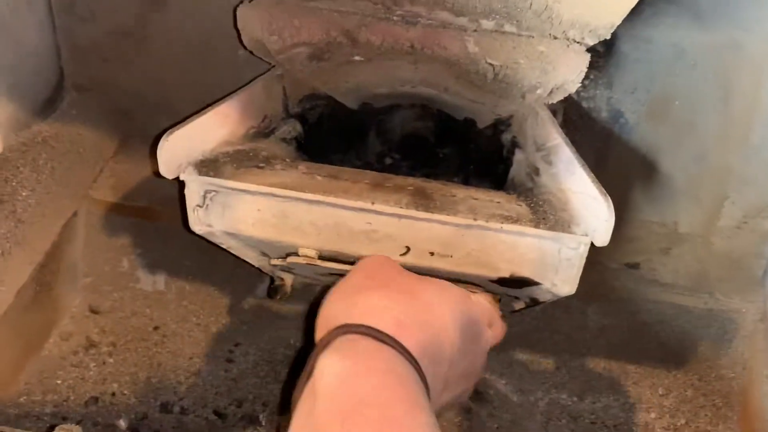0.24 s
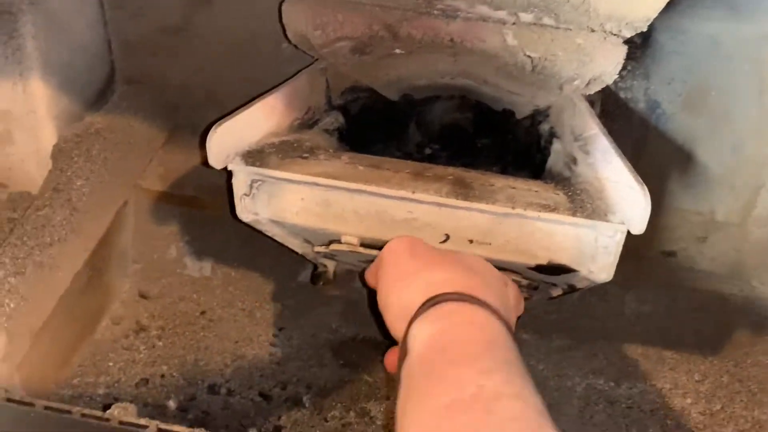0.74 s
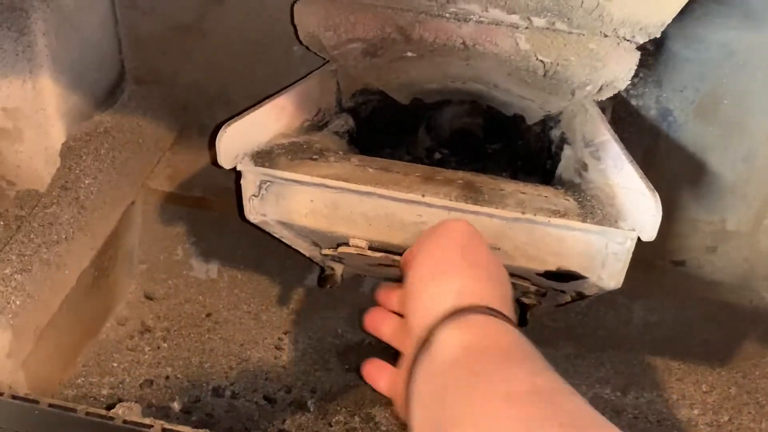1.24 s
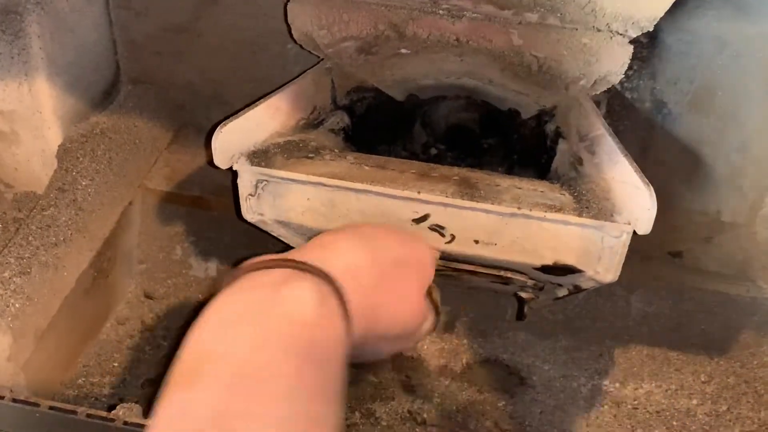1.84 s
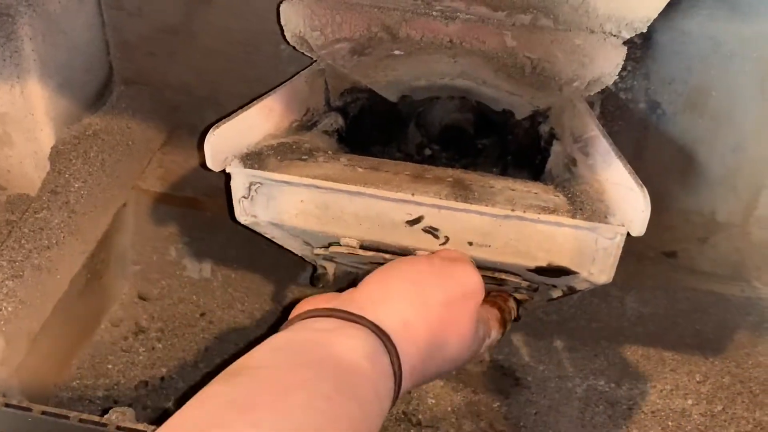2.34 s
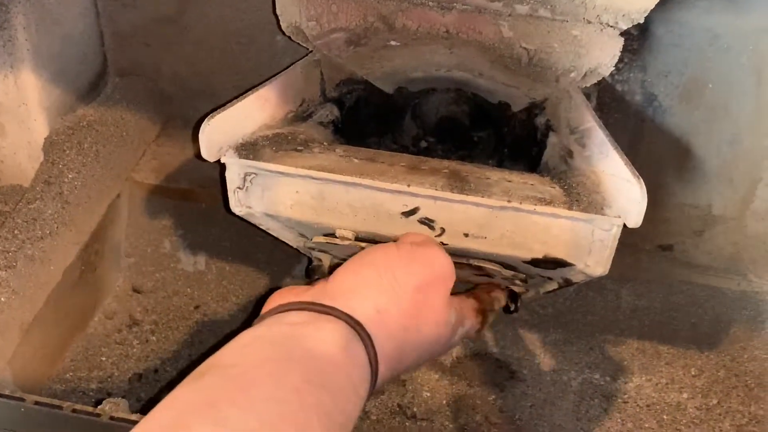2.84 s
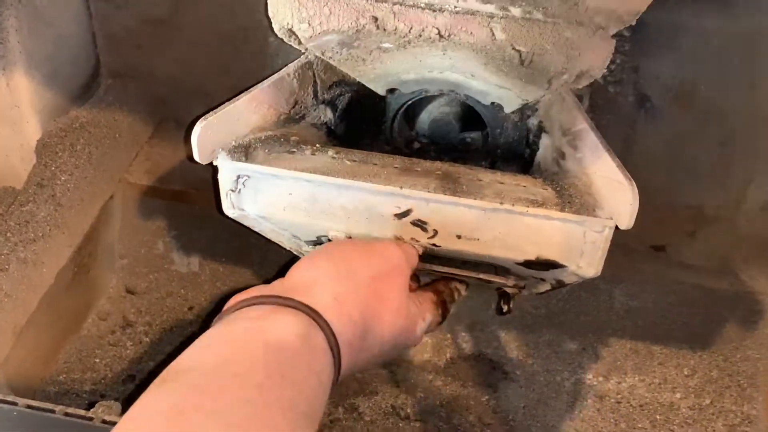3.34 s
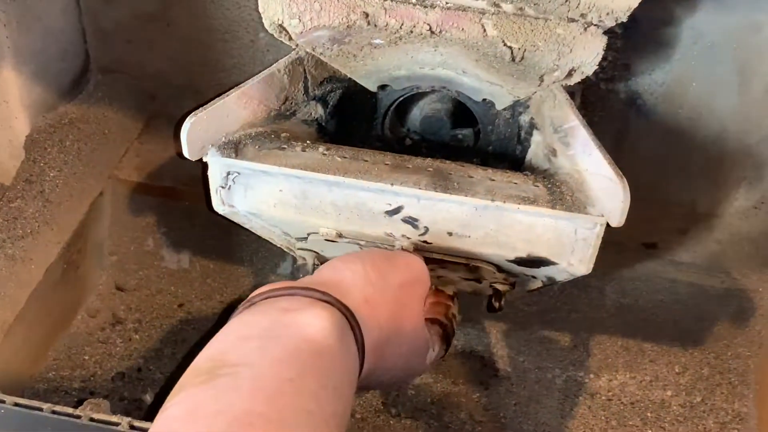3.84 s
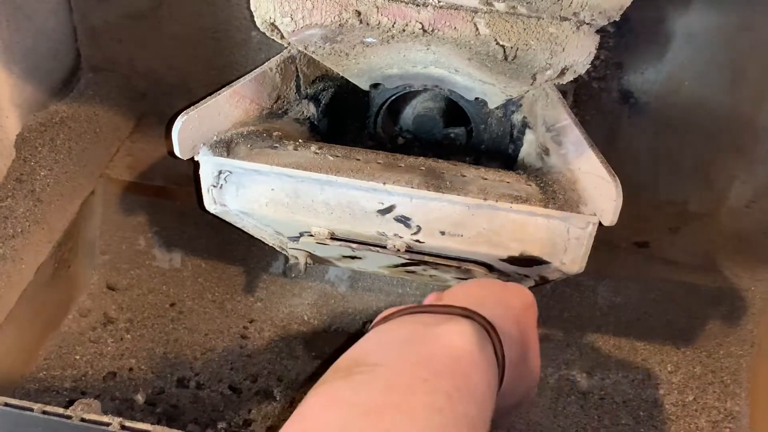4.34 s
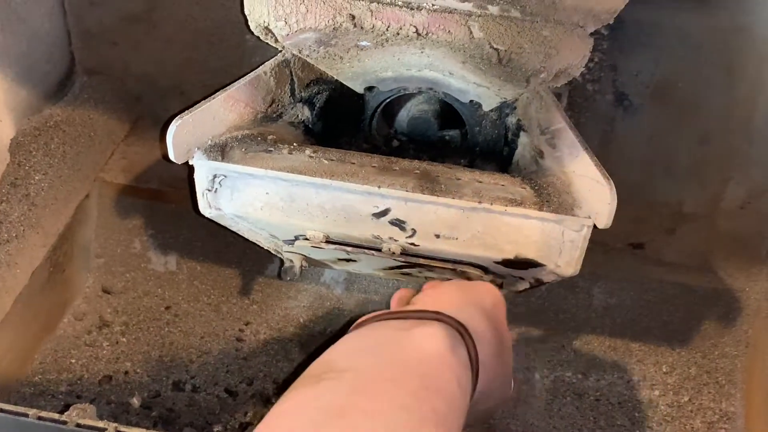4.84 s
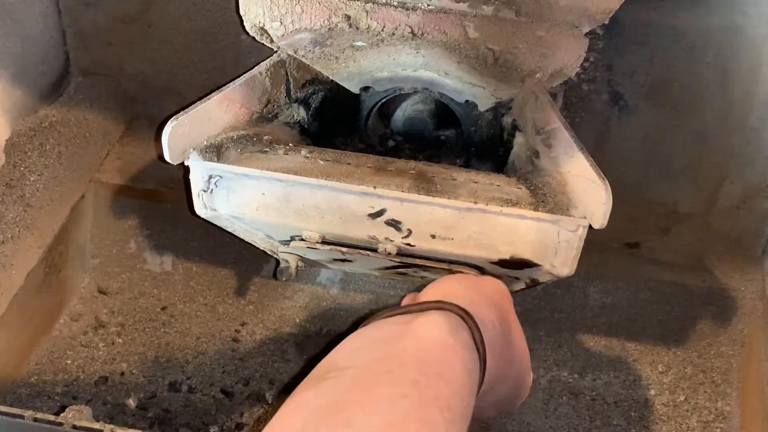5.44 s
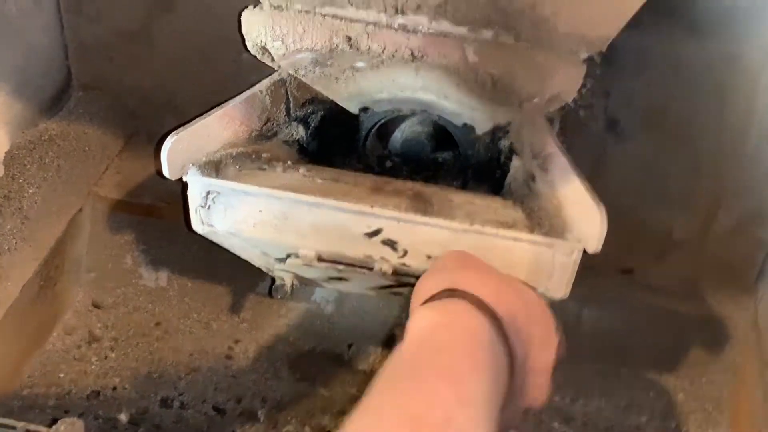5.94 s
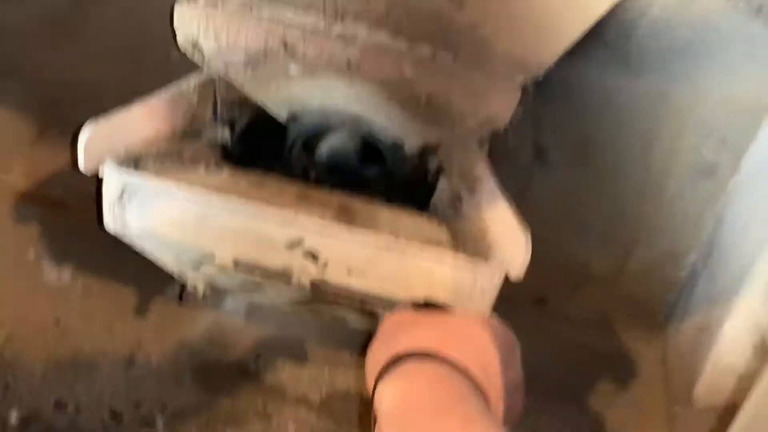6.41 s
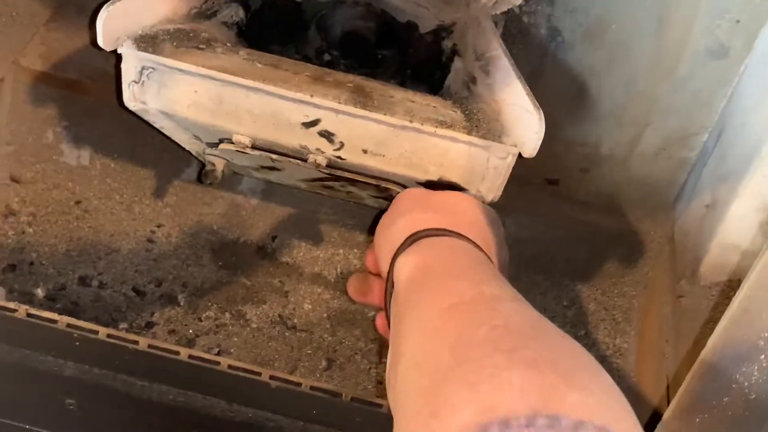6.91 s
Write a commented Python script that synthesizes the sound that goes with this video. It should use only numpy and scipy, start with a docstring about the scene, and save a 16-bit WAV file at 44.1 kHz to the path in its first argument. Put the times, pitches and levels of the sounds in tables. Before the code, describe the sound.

Close stereo sound of a stiff slide on a small sheet-metal stove's ash door, in a quiet small room with a faint steady low hum. At 0 s three quick hard clanks boom in the hollow pan with brief squeals and a rattle. From 0.2 to 2.3 s there are only faint gritty rubs and a soft low thump near 0.6. At 2.4 a loud bright double clack strikes, then smaller knocks, scraping and loose jiggling until 2.6. Light taps lead to sharp clanks at 3.2, with high wire ringing, and the loudest double clack at 3.47. Dull knocks follow at 3.7. A moderate clack comes at 4.4 and a bright, slightly squealing one at 5.0. Soft jiggling and pattering ash crumbs rise near 5.5, with lighter knocks around 6.0 and 6.6, low handling rumbles, and faint scraping to the end near 7 s.

```python
"""The stiff slide on a small metal stove's ash door scrapes, clanks and thumps, close by in a small room.
Grit crushed in uneven slips rasps; chattering blows ring the door and boom in the hollow pan, and a loose
slide rattles on after sharp ones. Swells of narrow noise squeal and rumble; the wire handle's modes ring.
Chance taps and rubbing jiggle the loose door, and crumbs of ash patter down as short noise ticks.
A faint mains hum wavers in still air; two spaced microphone ports hear it all, with a short room tail."""
import sys
import numpy as np
from scipy import signal
from scipy.fft import rfft, irfft, next_fast_len
from scipy.io import wavfile
from scipy.ndimage import uniform_filter1d

SR = 44100
rng = np.random.default_rng(int(sys.argv[2]) if len(sys.argv) > 2 else 0)


def generate_wav(sig):
    """Save sig (samples, or channels by samples) to the path in sys.argv[1] as 16-bit PCM at SR."""
    pcm = np.round(np.clip(np.atleast_2d(sig).T, -1, 1) * 32767).astype(np.int16)
    wavfile.write(sys.argv[1], SR, pcm)


N = 316197

# Blows of the slide. Hardness sets treble against middle: near 0 is bare metal, -30 is cushioned by ash.
# Columns: start_s, strength_db, hardness_db, rise_s, grind_s (how long the edges grind at full force)
KNOCKS = [(.0095, -30, -6.5, 0.00039, 0.0053), (0.0401, -28, -3.5, 0.00044, 0.004),
          (0.058, -29.5, -5, 0.00056, 0.0087), (0.231, -55.5, -42, 0.00058, 0.0023),
          (.385, -74, -29, 0.0028, 0.0096), (1.024, -75.5, -4, .004, 0.016),
          (1.491, -72.5, -10, 0.00095, 0.0035), (2.067, -53.5, -20, .001, 0.0025),
          (2.392, -25, 1.5, 0.00067, 0.0054), (2.403, -26.5, -25, 0.00049, 0.0026),
          (2.463, -39.5, -12.5, 0.00036, .001), (2.5, -35.5, -4.5, 0.00065, 0.0031),
          (2.555, -40.5, -10.5, 0.0029, 0.0019), (2.604, -49, -29, 0.00095, 0.0038),
          (2.762, -81, 8.5, .001, 0.0021), (2.912, -69.5, 7, 0.001, 0.003),
          (2.953, -49, -26.5, 0.0013, 0.0012), (2.99, -60, 1, 0.0019, 0.0045),
          (3.054, -58, -15.5, 0.0026, 0.0038), (3.114, -44.5, -12.5, 0.002, 0.0088),
          (3.178, -27, -2.5, 0.00048, 0.015), (3.2311, -30.5, -2, 0.00065, 0.003),
          (3.258, -37.5, -11, 0.0013, 0.0022), (3.462, -23.5, -0.5, 0.0013, 0.0073),
          (3.4705, -23, -3, 0.00015, 0.0019), (3.675, -53, -28.5, 0.0032, 0.005),
          (3.714, -51, -32.5, 0.0055, 0.015), (3.741, -42, -35.5, 0.001, 0.006),
          (4.117, -64.5, -22.5, 0.0013, 0.0038), (4.155, -61.5, -12, 0.0015, 0.0052),
          (4.265, -57.5, -44, 0.003, 0.018), (4.355, -50.5, 0.5, 0.0031, 0.0061),
          (4.394, -35.5, -2.5, 0.00061, 0.0067), (4.501, -64.5, 1.5, 0.00088, .003),
          (4.543, -61, -32, 0.0013, 0.0097), (4.73, -65, -16.5, 0.0018, 0.015),
          (4.829, -50.5, -2, 0.0018, 0.0031), (4.965, -51.5, -19, 0.0066, 0.0086),
          (5.005, -39.5, 2.5, 0.00047, 0.0056), (5.029, -52, -31, 0.00044, .002),
          (5.454, -45.5, -17.5, 0.00091, 0.0063), (5.543, -71, -30, 0.0051, .012),
          (5.579, -54.5, -5, 0.002, 0.014), (5.671, -65, 0.5, 0.00098, 0.0037),
          (5.878, -74, 8.5, 0.0008, 0.0026), (5.937, -52.5, -9, 0.00024, 0.00092),
          (5.957, -52, -22, .002, 0.021), (6.012, -42.5, -0.5, 0.0054, 0.0061),
          (6.04, -55.5, -20, .002, 0.0037), (6.534, -68, -10, 0.0012, 0.0025),
          (6.591, -41, -2, 0.0026, 0.012), (6.639, -56.5, -25, .002, 0.0044),
          (7.035, -52, -29.5, 0.0038, 0.0064)]
# Broad spectrum of metal struck by the slide. Columns: frequency_hz, density_db (per Hz)
KNOCK_COLOUR = [(20, -47.5), (60, -17.5), (110, -0.5), (190, 3), (300, -0.5), (500, -4), (1100, -7.5),
                (1700, -7.5), (3000, 0.5), (5000, -11), (7000, -6.5), (11000, 0), (13000, -2),
                (16000, -6.5)]


def amp(db):
    """Decibels to gain."""
    return 10 ** (np.asarray(db) / 20)


def unit(x):
    """Scales to rms 1."""
    return x / np.sqrt(np.mean(x ** 2) + 1e-20)


def fade(t, t60):
    """Exponential decay that falls by 60 dB in t60 seconds."""
    return np.exp(-np.log(1000) * t / t60)


def unevenness(count, size):
    """Random wobble of rms 1 that changes within about size samples."""
    return unit(uniform_filter1d(rng.standard_normal(count), size))


def read(points, hz):
    """Reads a table on a log-frequency axis."""
    f, value = np.transpose(points)
    return np.interp(np.log(hz + 1), np.log(f + 1), value)


def add(mix, s, sound):
    """Adds a sound to the two-channel mix at time s."""
    part = mix[:, max(round(s * SR), 0):][:, :sound.shape[-1]]
    part += sound[..., :part.shape[-1]]


def colour(x, points):
    """Filters by a smooth spectrum, with the minimum phase that keeps it causal."""
    size = 2 * next_fast_len(x.shape[-1] // 2 + 2048)
    log_gain = np.log(amp(read(points, abs(np.fft.fftfreq(size, 1 / SR)))))
    response = np.exp(signal.hilbert(log_gain).conj())[:size // 2 + 1]
    return irfft(rfft(x, size) * response, size)[..., :x.shape[-1]]


def registers(x):
    """Splits into the pan's bass, the door's middle and the contact's treble."""
    parts = []
    for hz, kind in [(700, "low"), ([700, 6000], "band"), (6000, "high")]:
        sos = signal.butter(4, hz, kind, fs=SR, output="sos")
        parts.append(signal.sosfilt(sos, x))
    return parts


def rings(modes, gain_db=11.0):
    """Each strong mode rings as a decaying cosine, one a row; a wider resonance dies sooner."""
    t = np.arange(SR // 4) / SR
    hz, width, db = np.transpose(modes)[:, :, None]
    rate = np.pi * width
    return amp(db + gain_db) * 2 * rate / SR * np.exp(-rate * t) * np.cos(2 * np.pi * hz * t)


def touch(body, ring_db, sheet_db, place_db=3.3, sheet_t60=.12, modes_per_hz=.008):
    """Response at one point of contact: the direct click, its own mix of strong modes, and many weak sheet modes."""
    count = body.shape[1]
    t = np.arange(count) / SR
    awake = rng.random(count // 2 + 1) < modes_per_hz * SR / count
    phase = 2 * np.pi * rng.random((2, len(awake)))
    sheet = irfft(awake * np.exp(1j * phase), count) * fade(t, sheet_t60)
    strong = amp(ring_db + place_db * rng.standard_normal(len(body))) @ body
    click = t == 0
    return click + strong + amp(sheet_db) * sheet / np.linalg.norm(sheet[0])


def background(hum_hz=120, hum_db=-61.5, air_db=-66, waver=0.12):
    """Mains hum, a sine wavering slightly in level and phase, in the coloured noise of still room air."""
    # Spectrum of the quiet room. Columns: frequency_hz, density_db (per Hz)
    air_colour = [(20, -12.5), (60, 1.5), (100, 4.5), (200, -9.5), (400, -15.5), (1000, -23.5),
                  (3000, -29.5), (5500, -38), (8000, -33), (11000, -34), (16000, -33.5)]
    t = np.arange(N) / SR
    slow = [(1, 0), (6, 0), (40, -50), (200, -120)]  # Hz, dB: keeps the drift slow
    level_drift, phase_drift = unit(colour(rng.standard_normal((2, N)), slow))
    hum = (1 + waver * level_drift) * np.sin(2 * np.pi * hum_hz * t + waver * phase_drift)
    still_air = unit(colour(rng.standard_normal((2, N)), air_colour))
    return amp(hum_db) * unit(hum) + amp(air_db) * still_air


def scrapes(grains_per_s=600, spread_db=3.0, smooth=0.22, slip_db=2.0, lurch_db=1.24, ring_db=5, sheet_db=-2):
    """Grit crushed in tiny uneven slips, as noise with random grains; each stroke swells, lurches and eases off."""
    # Strokes, and a short noise swelling just before the blow at 2.39 s; fizz is the treble over the rasp,
    # change runs along the stroke. Columns: start_s, length_s, pressure_db, fizz_db, change_db
    strokes = [(0, 0.048, -31.5, -8.5, -30), (0.363, 0.041, -69.5, -13, 9), (0.605, 0.13, -59, -14, -8),
               (0.681, 0.2, -71, -10, -8), (1.103, 0.13, -60.5, -12, -8), (1.206, .09, -71, -17, -10),
               (1.533, 0.046, -76.5, 10.5, 1), (1.762, 0.064, -66, 1.5, 2.5), (1.944, 0.15, -63, -10, -11),
               (2.059, 0.16, -59, -11, -10), (2.222, 0.055, -74.5, -1, -6), (2.36, 0.07, -44.5, -4, 14),
               (2.43, 0.09, -47, -5, -3.5), (2.522, 0.094, -51.5, 0, -26), (3.163, 0.03, -38, 0.5, 30),
               (3.394, 0.098, -42.5, -4.5, 5.5), (3.922, 0.18, -57, -12, -18), (4.346, 0.073, -49.5, 0, -2),
               (4.433, 0.096, -59.5, -11, 12), (4.6, 0.092, -70, -21, -0.5), (4.751, 0.087, -69.5, -15, 4),
               (5.218, 0.056, -60, -7.5, -22), (5.344, 0.077, -64, -2.5, 1), (5.73, 0.14, -60.5, -6, -9),
               (6.13, 0.135, -61.5, -8, 16), (6.296, 0.073, -72, -24, 1), (6.565, 0.046, -52, -2.5, 15),
               (6.781, 0.15, -59, -4.5, 15)]
    # Broad spectrum of scraping. Columns: frequency_hz, density_db (per Hz)
    scrape_colour = [(30, -35), (120, -6), (222, 13), (300, 3.5), (500, 0), (700, -9.5), (920, 1),
                     (1400, -5.5), (1750, -5), (2600, -3.5), (3500, -5.5), (4350, -7.5), (5500, -17),
                     (7500, -17.5), (11000, -10.5), (16000, -13)]
    # Resonances rubbing brings out of the sooty compartment. Columns: frequency_hz, width_hz, level_db
    compartment = [(220, 25, -0.5), (480, 18, 2.5), (809, 19, -3), (933, 80, -1), (1653, 16, 3),
                   (1900, 56, -4.5), (2353, 29, -1.5), (2580, 19, 3.5), (2880, 18, 1.5), (3535, 28, -3.5),
                   (4254, 40, 0), (4430, 28, 0), (5390, 90, -4)]
    bite_s, ease_s = 0.043, .04  # ramps at the start and end of a stroke
    drone_db = -2.5  # bass against the rasp in the middle
    hollow = rings(compartment)
    out = np.zeros((2, N))
    for s, length, pressure, fizz, change_db in strokes:
        bands = registers(colour(touch(hollow, ring_db, sheet_db), scrape_colour))
        count, size = int(length * SR), SR // 2
        t = np.arange(count) / SR
        speed = np.minimum(t / bite_s, 1) * np.minimum((length - t) / ease_s, 1)
        push = speed * amp(change_db * t / length)
        grain_size = amp(spread_db * np.minimum(rng.exponential(1, size), 4))
        grit = (rng.random(size) < grains_per_s / SR) * grain_size
        grip = amp(slip_db * unevenness(size, size=300) + lurch_db * unevenness(size, size=1500))
        force = rng.standard_normal((2, size)) * (smooth + grit) * grip
        for band, db in zip(bands, (drone_db, 0, fizz)):
            sound = signal.fftconvolve(force[:, :count] * push, band, axes=1)
            add(out, s, amp(pressure + db) * sound / np.std(sound[:, :count], axis=1, keepdims=True))
    return out


def swells(rows, peak_share=.14):
    """Narrow noise around one pitch swells to an early peak and fades."""
    out, hz = np.zeros((2, N)), np.fft.rfftfreq(SR, 1 / SR)
    for s, length, pitch_hz, width_hz, db in rows:
        resonance = 1 / (1 + (2 * (hz - pitch_hz) / width_hz) ** 2)
        tone = irfft(rfft(rng.standard_normal((2, SR))) * resonance)
        u = np.linspace(0, 1, int(length * SR))
        shape = np.minimum(u / peak_share, 1) * (1 - u) ** 2
        sound = tone[:, :len(u)] * shape
        add(out, s, amp(db) * sound / np.std(sound, axis=1, keepdims=True))
    return out


def thumps_and_rumbles():
    """Short swells of low and low-middle noise: thumps, handling rumble and panel ringing."""
    # Columns: start_s, length_s, pitch_hz, width_hz, level_db
    low_rows = [(0, 0.24, 205, 56, -43), (0.01, 0.13, 520, 220, -39), (0.01, 0.42, 69, 40, -62),
                (.05, .1, 594, 40, -36.5), (.635, 0.16, 228, 45, -55), (.64, .1, 400, 200, -62),
                (3.47, .1, 100, 60, -52), (2.391, 0.058, 707, 30, -35), (2.391, 0.06, 590, 160, -36),
                (2.392, 0.06, 160, 70, -46), (5.005, 0.08, 200, 160, -52), (6.83, 0.15, 226, 25, -57),
                (5.935, 0.12, 71, 30, -58), (6.11, 0.26, 50, 41, -59), (6.6, 0.08, 150, 69, -55)]
    return swells(low_rows)


def jiggle_level():
    """Level in dB, over time, of the hand's jiggling at the loose door."""
    # Two lists in sequence, level before each band's own gain. Columns: time_s, level_db
    course = [
        [(0.3, -73), (0.98, -82), (2.41, -69.5), (2.55, -39), (2.69, -64), (2.9, -57.5)],
        [(3.8, -63), (5.05, -63), (5.56, -52.5), (6.56, -75), (6.72, -67.5), (7.15, -63)],
    ]
    return np.interp(np.arange(N) / SR, *np.vstack(course).T)


def jiggle(body, gains_db=(-1.5, -13, -32), taps_per_s=18, tap_t60=0.24, rub=0.12, ring_db=-2, sheet_db=0):
    """Soft chance taps and light rubbing of the loose door, heard mostly through the pan."""
    # Broad spectrum of the jiggling. Columns: frequency_hz, density_db (per Hz)
    jiggle_colour = [(30, -20), (130, 9), (250, 6.5), (500, -4.5), (1000, -9.5), (2500, -3.5),
                     (5000, -24.5), (16000, -25.5)]
    taps = (rng.random(N) < taps_per_s / SR) * rng.random(N)
    contact = rub + signal.fftconvolve(taps, fade(np.arange(SR // 5) / SR, tap_t60))[:N]
    force = rng.standard_normal((2, N)) * contact
    bands = registers(colour(touch(body, ring_db, sheet_db), jiggle_colour))
    sound = np.zeros((2, N))
    for band, db in zip(bands, gains_db):
        sound += amp(db) * unit(signal.oaconvolve(force, band, axes=1)[:, :N])
    return sound * amp(jiggle_level())


def crumbs(level_db=-11, crumbs_per_s=70, spread_db=3, crumb_t60=.06):
    """Crumbs of ash loosened by the jiggling land in the pan, each with its own short, dull tick."""
    # Spectrum of crumbs on the pan. Columns: frequency_hz, density_db (per Hz)
    crumb_colour = [(60, -27), (300, 5.5), (1000, -3.5), (2000, -13.5), (7000, -31.5), (16000, -32.5)]
    t, out = np.arange(SR // 16) / SR, np.zeros((2, N))
    size = (rng.random(N) < crumbs_per_s / SR) * amp(spread_db * np.minimum(rng.exponential(1, N), 3))
    for at in np.flatnonzero(size):
        tick = rng.standard_normal((2, len(t))) * fade(t, crumb_t60)
        add(out, at / SR, size[at] * tick)
    return unit(colour(out, crumb_colour)) * amp(level_db + jiggle_level())


def squeals():
    """Metal squeals where the slide binds, as short swells of narrow noise."""
    # Columns: start_s, length_s, pitch_hz, width_hz, level_db
    squeal_rows = [(.009, .075, 1348, 70, -37), (.009, .08, 1110, 160, -39), (.009, .025, 4230, 120, -36),
                   (.04, .043, 3860, 160, -32), (.04, .043, 10990, 202, -32), (2.77, .09, 3450, 350, -76),
                   (2.845, .07, 3350, 350, -72), (5.005, .026, 2930, 250, -34), (5.02, .19, 2780, 600, -60)]
    return swells(squeal_rows)


def knocks(body, gains_db=(0, 1.5, 2), t60s=(.06, .04, .025), chatter_db=3.5, dulling=1.0, ring_db=0, sheet_db=-2):
    """Each knock is a burst of chattering contact and a rebound; a soft contact also dulls the door's clang."""
    # the pan's boom grows more slowly than the blow: dB at a firm blow, that blow's strength, dB per dB
    boom_db, firm_db, boom_slope = -38, -30.5, 0.68
    # heavier blows flex the whole door and fill out its clank: threshold dB, dB per dB
    flex_from_db, flex_slope = -35, 0.13
    rebound_s, rebound_db = .009, -10.5  # the slide springs back and strikes once more
    out, t = np.zeros((2, N)), np.arange(SR // 8) / SR
    for s, strength, hardness, rise, grind in KNOCKS:
        boom = boom_db + boom_slope * (strength - firm_db)
        flex = flex_slope * max(strength - flex_from_db, 0)
        bands = registers(colour(touch(body, ring_db, sheet_db), KNOCK_COLOUR))
        chatter = amp(chatter_db * unevenness(len(t), size=60))
        force = rng.standard_normal((2, len(t))) * chatter * (1 - np.exp(-t / rise))
        # treble tilt: dull below -5 dB of hardness, brighter above
        force = colour(force, [(1200, 0.0017), (5000, dulling * min(hardness + 5, 5))])
        force = colour(force, [(300, 0), (600, flex), (1300, flex), (2600, 0)])
        levels_db = (boom, strength, strength + hardness)
        for band, db, gain_db, t60 in zip(bands, levels_db, gains_db, t60s):
            first = fade(np.maximum(t - grind, 0), t60)
            rebound = amp(rebound_db) * (t > rebound_s) * fade(t - rebound_s, t60)
            sound = signal.fftconvolve(force * (first + rebound), band, axes=1)
            start_rms = np.std(sound[:, :SR // 50], axis=1, keepdims=True)  # over 20 ms
            add(out, s, amp(db + gain_db) * sound / start_rms)
    return out


def rattle(body, level_db=-14, gap_s=.022, fall_db_per_s=150, spread_db=2.5, tap_t60=0.0049,
           ring_db=2, sheet_db=-2, count=5):
    """After a sharp blow the loose slide bounces on in its guide: fading, uneven taps, each at another spot."""
    from_db = -45.5  # blows whose strength plus hardness exceeds this set it off
    out, t = np.zeros((2, N)), np.arange(SR // 50) / SR
    for s, strength, hardness, rise, grind in KNOCKS:
        if strength + hardness > from_db:
            for delay in grind + gap_s * np.cumsum(.5 + rng.random(count)):
                force = rng.standard_normal((2, len(t))) * fade(t, tap_t60)
                spot = colour(touch(body, ring_db, sheet_db), KNOCK_COLOUR)
                tap = signal.fftconvolve(force, spot, axes=1)
                db = strength + level_db - fall_db_per_s * delay + spread_db * rng.standard_normal()
                add(out, s + delay, amp(db) * tap / np.std(tap[:, :len(t)]))
    return colour(out, [(1000, -0.5), (4000, -6.5), (11000, -16)])


def pings(falloff_db=18):
    """The wire handle springs free and rings; modes far from the leading pitch are weaker, in dB per octave."""
    # Moments when the handle rings. Columns: start_s, level_db, lead_hz
    ping_rows = [(2.394, -50, 10030), (3.117, -46.5, 5270), (3.233, -27, 7900), (3.232, -44, 14600),
                 (3.469, -34.5, 14000), (4.395, -46, 11580), (4.829, -59.5, 12900), (5.005, -45.5, 11400),
                 (5.453, -45.5, 5150), (5.455, -46, 12000), (6.018, -46.5, 13200)]
    # Modes of the handle. Columns: frequency_hz, level_db, t60_s
    handle = [(5230, 0, 0.13), (6550, -6, .1), (7675, -4.5, 0.14), (8165, -8, .13), (9750, 5, 0.085),
              (11100, -1, 0.11), (11300, 4, 0.084), (12800, -1, 0.091), (14150, -4.5, .09),
              (14000, 1, .085), (15200, -9, .07)]
    out, t = np.zeros((2, N)), np.arange(SR // 3) / SR
    for s, blow_db, lead_hz in ping_rows:
        for hz, db, t60 in handle:
            level = amp(blow_db + db - falloff_db * abs(np.log2(hz / lead_hz)))
            add(out, s, level * fade(t, t60) * np.sin(2 * np.pi * (hz * t + rng.random())))
    return out


def room(x, wet_db=(-8, -13, -21), t60s=(.48, .38, .2), onset=0.00018):
    """The firebox and the small room give a short tail of decaying noise, longest in the bass."""
    t = np.arange(SR * 2 // 3) / SR
    tail = np.zeros((2, len(t)))
    for part, db, t60 in zip(registers(rng.standard_normal(tail.shape)), wet_db, t60s):
        shape = fade(t, t60) * (1 - np.exp(-t / onset))
        tail += amp(db) * part * shape / np.linalg.norm(shape)
    return signal.fftconvolve(x, tail, axes=1)[:, :N]


def room_by_turns(x, turn_hz=2.3, count=3):
    """Several noise tails take turns, so that no single random tail colours every sound."""
    turn = 2 * turn_hz * np.arange(N) / SR
    out = x.copy()
    for k in range(count):
        share = np.sqrt(2 / count) * np.cos(np.pi * (turn + k / count))  # the squared shares sum to 1
        out += room(x * share)
    return out


def ports(x):
    """Two spaced microphone ports share part of the sound, with a phase lag between them."""
    # How far the left port leads the right. Columns: frequency_hz, lead_rad
    phase_lead = [(20, 0), (550, 0), (1100, .3), (1700, 1.0), (2500, 2.1), (4000, 1.5), (5600, 1.3),
                  (6500, -.3), (8600, -3.1), (10400, -5.9), (11500, -6.7), (12600, -8.8), (14000, -9.8),
                  (15100, -12.5)]
    # How alike the two ports are. Columns: frequency_hz, likeness (1 is identical)
    likeness = [(20, .65), (120, .94), (250, .92), (500, .77), (1000, .62), (2000, .55), (5500, .45),
                (8500, .9), (16000, .72)]
    size = next_fast_len(N + 2048)
    hz, (left, other) = np.fft.rfftfreq(size, 1 / SR), rfft(x, size)
    same = np.clip(read(likeness, hz), -1, 1)
    mixed = same * left + np.sqrt(1 - same ** 2) * other
    right = mixed * np.exp(-1j * read(phase_lead, hz))
    return irfft(np.array([left, right]), size)[:, :N]


def scene():
    """All the sounds of the stove, in the room, over the hum, at the two ports."""
    # Resonances of the hollow ash pan, then of the door. Columns: frequency_hz, width_hz, level_db
    pan_modes = [(223, 22, -8.5), (288.2, 4.3, 0), (333, 2.9, -8), (474, 68, -1.5), (582, 6.3, -6.5)]
    door_modes = [(715.4, 8.4, -3.5), (937, 34, 2.5), (1045, 19, -4.5), (1104, 15, -8.5), (1333, 20, -3),
                  (1660, 14, -3.5), (1840, 15, -2.5), (2019, 20, 1.5), (2643, 20, -5), (2863, 40, -7),
                  (2940, 35, -2.5), (3863, 37, 0), (3890, 36, -6), (4270, 48, -5.5), (4795, 140, -2),
                  (4930, 38, -2.5), (6720, 30, -6.5), (9200, 81, -3), (9800, 48, -4), (10740, 27, -2.5),
                  (11385, 31, 0.5)]
    body = np.vstack([rings(pan_modes), rings(door_modes)])
    work = scrapes() + thumps_and_rumbles() + jiggle(body) + crumbs()
    work += squeals() + knocks(body) + rattle(body) + pings()
    return ports(room_by_turns(work) + background())


def record(dry):
    """The microphone's narrow dips in the treble, then the recorder's band limit."""
    # Dips in the response; width is from centre to 1/e of the depth. Columns: frequency_hz, width_hz, depth_db
    dips = [(8980, 150, 5.5), (14400, 380, 18.5)]
    edge_hz = 15950
    hz = np.fft.rfftfreq(N, 1 / SR)
    response_db = -sum(depth * np.exp(-((hz - centre) / width) ** 2) for centre, width, depth in dips)
    heard = colour(dry, np.column_stack([hz, response_db]))
    lowpass = signal.firwin(511, edge_hz, window=("kaiser", 9), fs=SR)
    return signal.oaconvolve(heard, lowpass[None], "same")


dry = scene()
out = record(dry)
generate_wav(out)
```